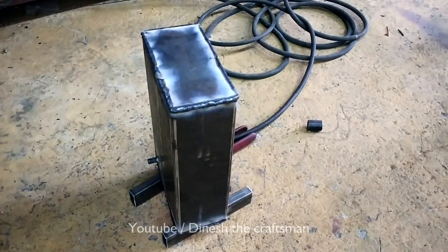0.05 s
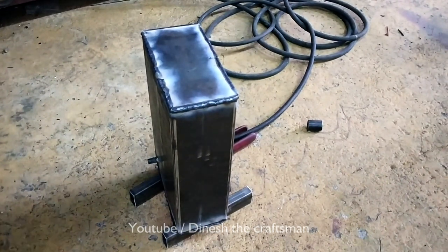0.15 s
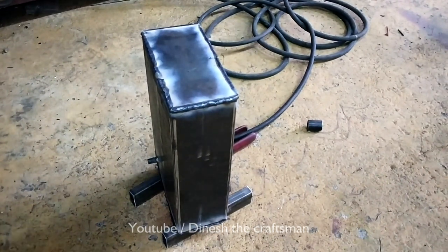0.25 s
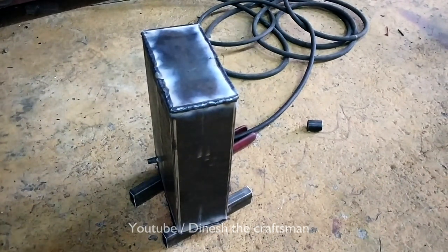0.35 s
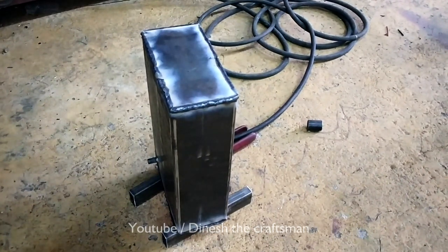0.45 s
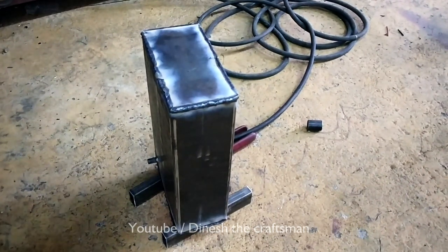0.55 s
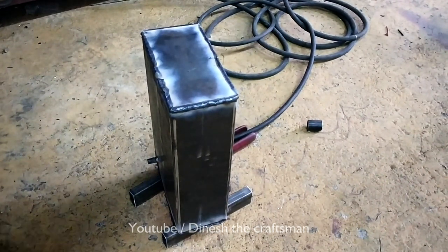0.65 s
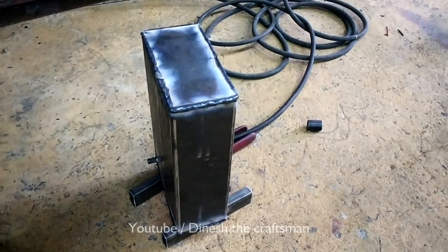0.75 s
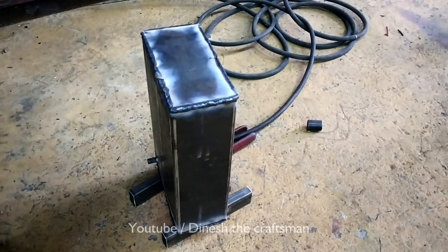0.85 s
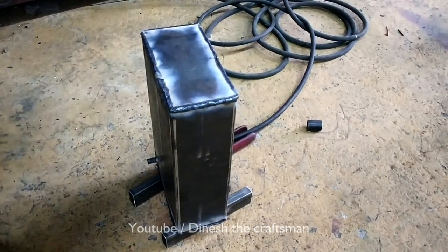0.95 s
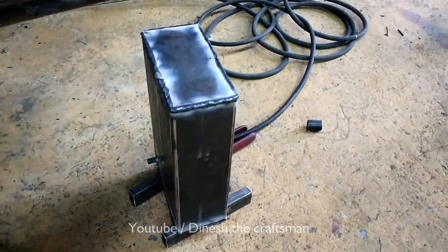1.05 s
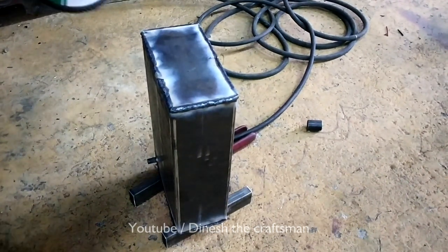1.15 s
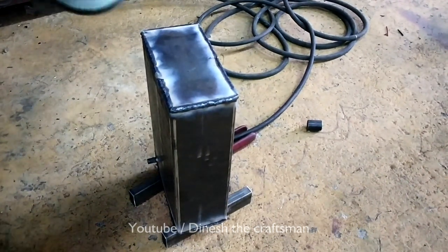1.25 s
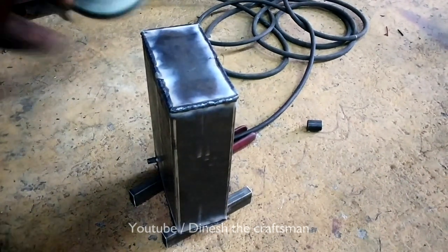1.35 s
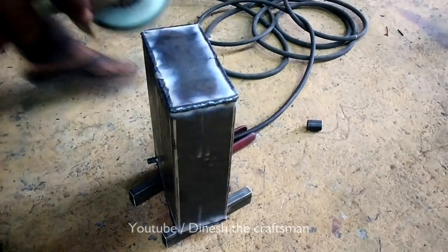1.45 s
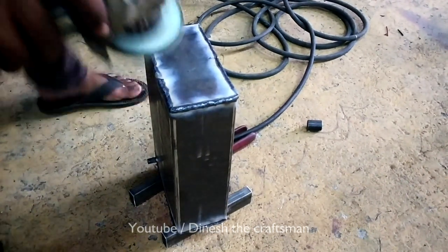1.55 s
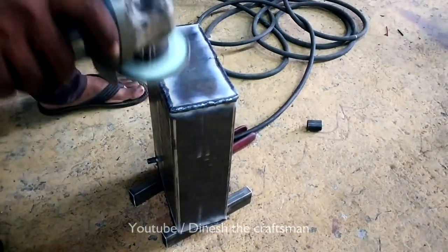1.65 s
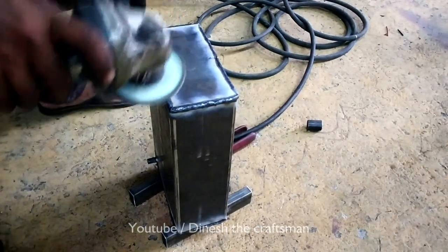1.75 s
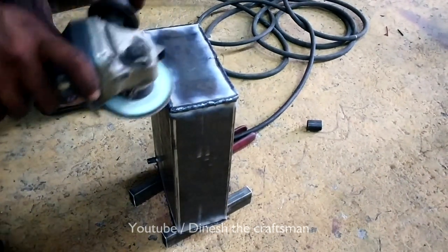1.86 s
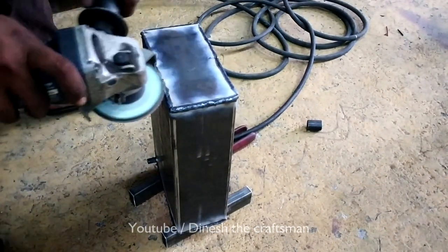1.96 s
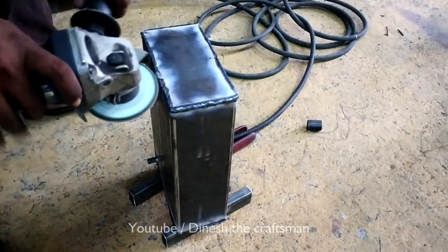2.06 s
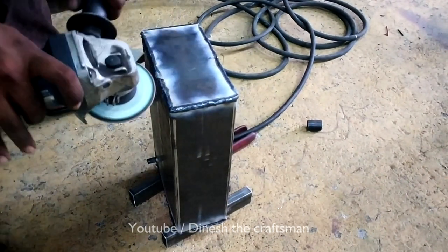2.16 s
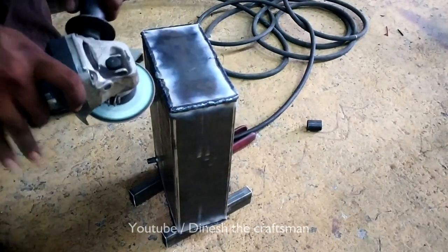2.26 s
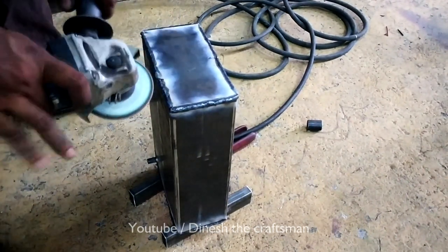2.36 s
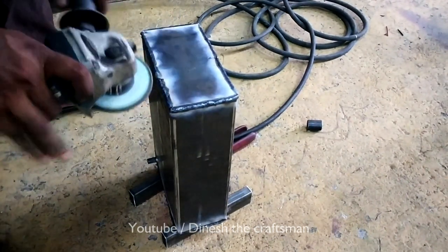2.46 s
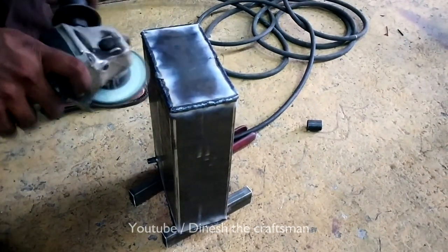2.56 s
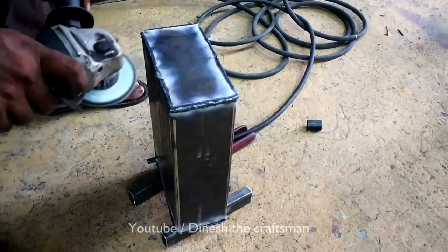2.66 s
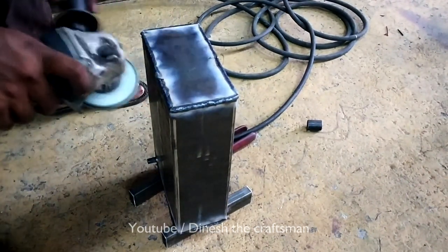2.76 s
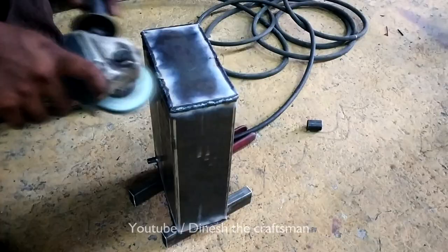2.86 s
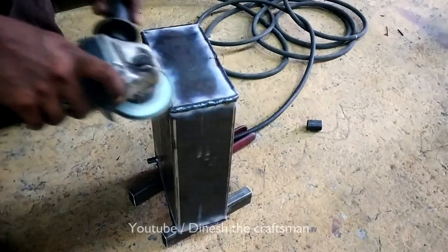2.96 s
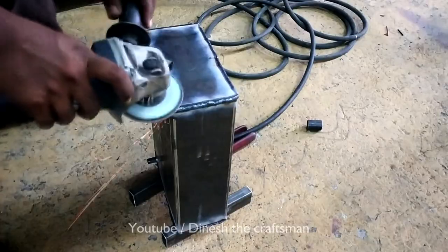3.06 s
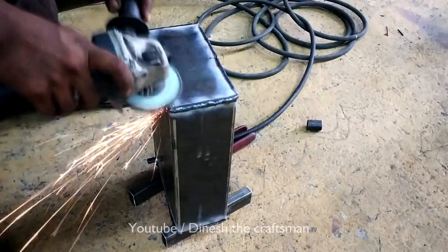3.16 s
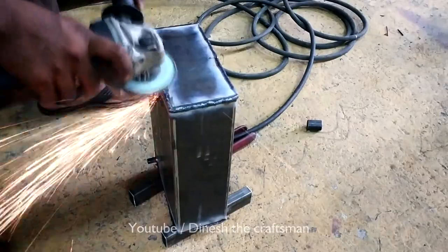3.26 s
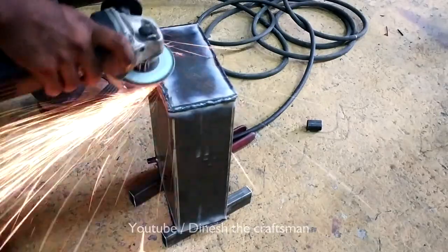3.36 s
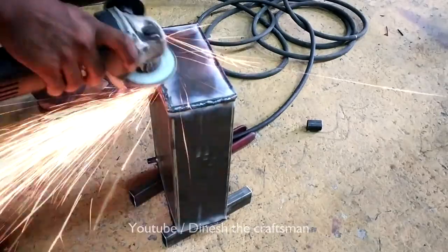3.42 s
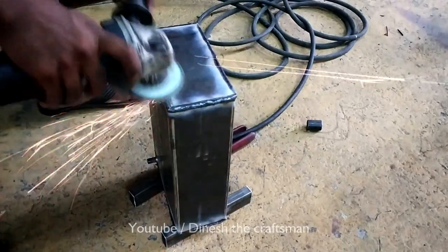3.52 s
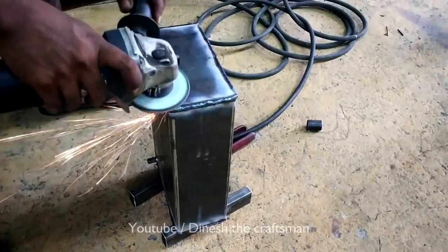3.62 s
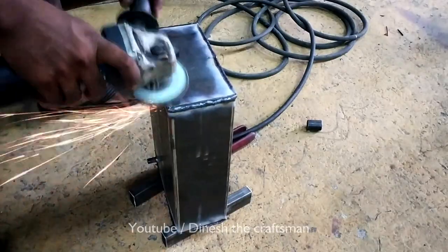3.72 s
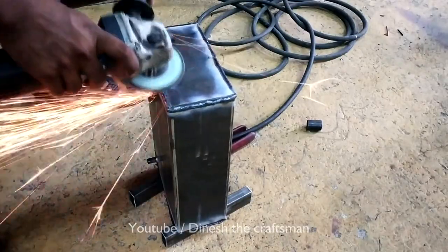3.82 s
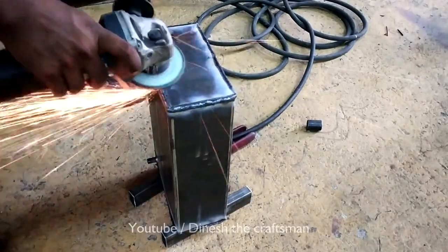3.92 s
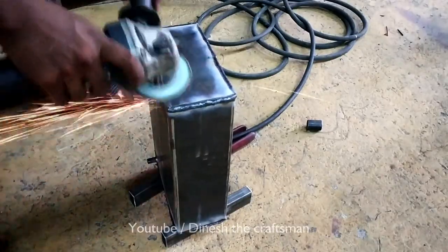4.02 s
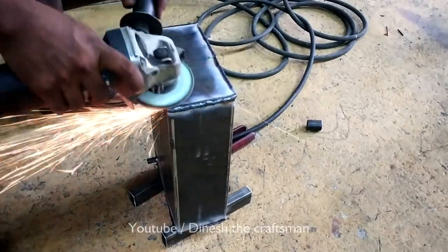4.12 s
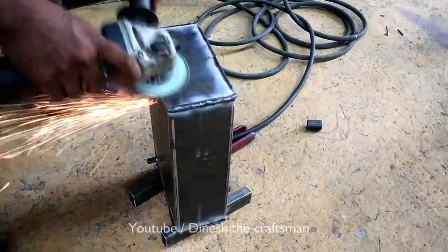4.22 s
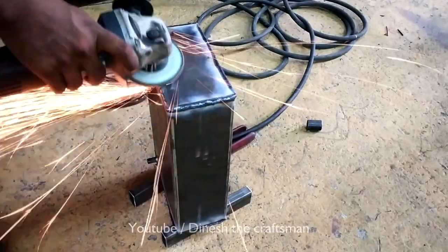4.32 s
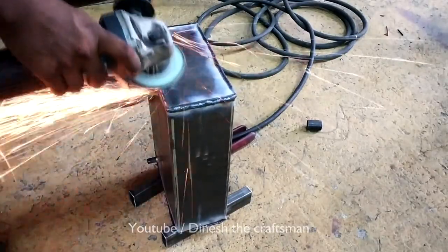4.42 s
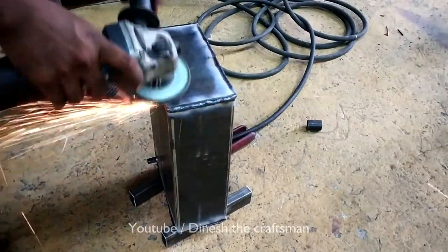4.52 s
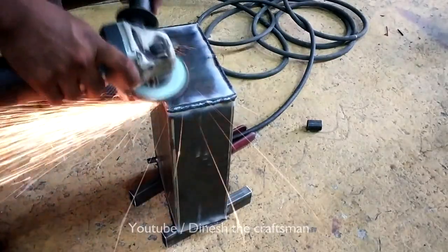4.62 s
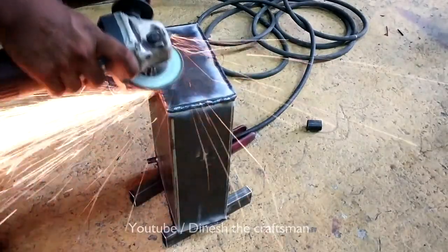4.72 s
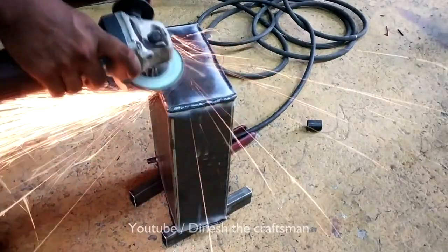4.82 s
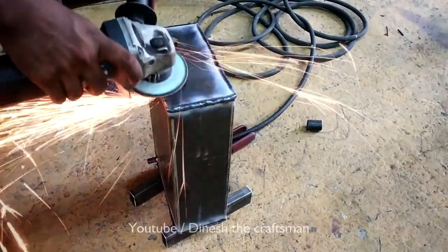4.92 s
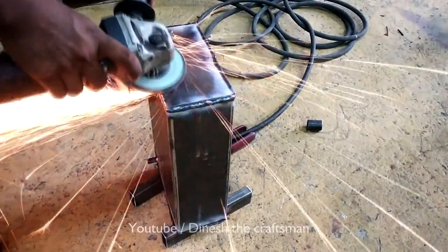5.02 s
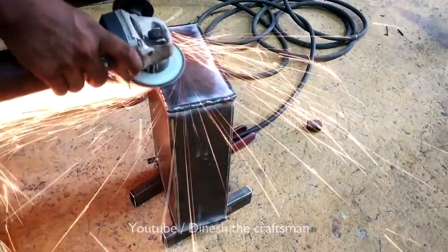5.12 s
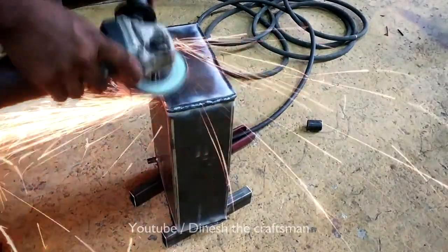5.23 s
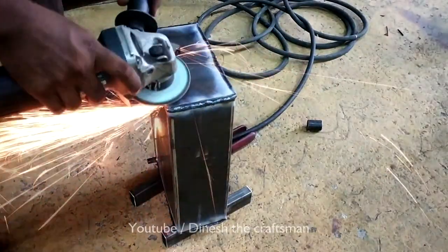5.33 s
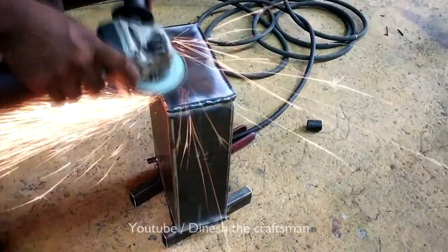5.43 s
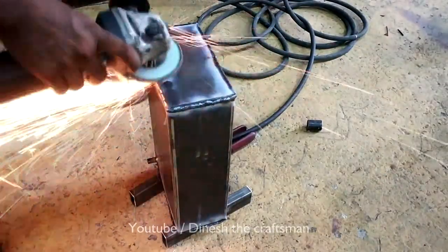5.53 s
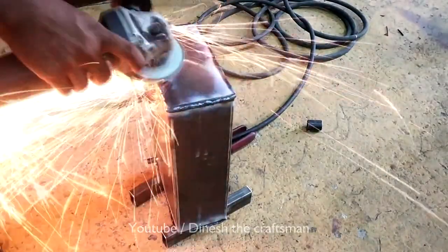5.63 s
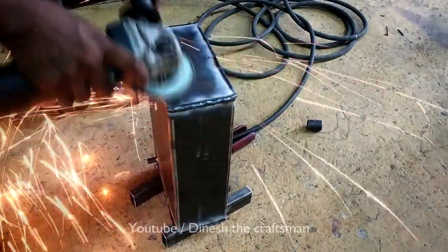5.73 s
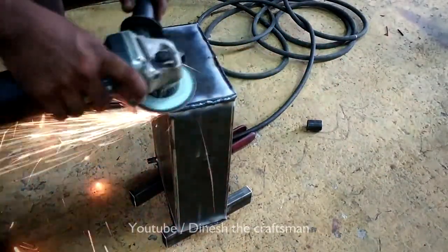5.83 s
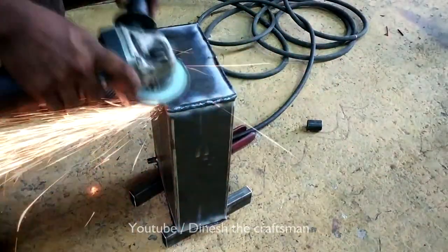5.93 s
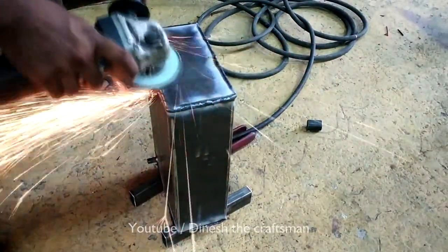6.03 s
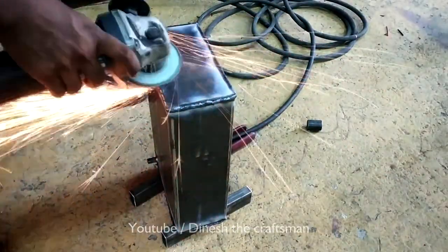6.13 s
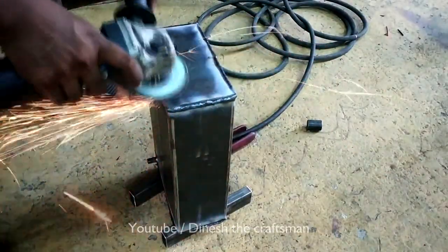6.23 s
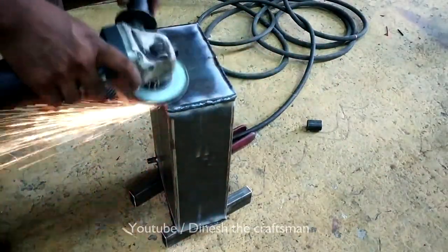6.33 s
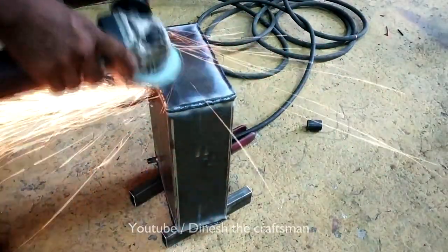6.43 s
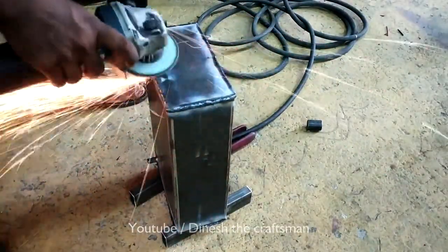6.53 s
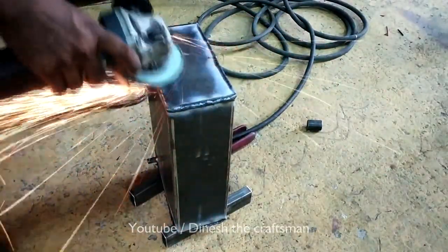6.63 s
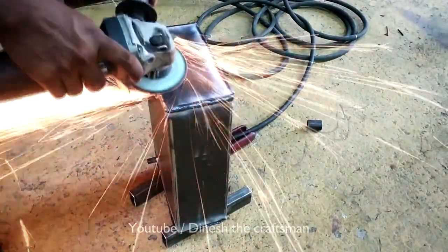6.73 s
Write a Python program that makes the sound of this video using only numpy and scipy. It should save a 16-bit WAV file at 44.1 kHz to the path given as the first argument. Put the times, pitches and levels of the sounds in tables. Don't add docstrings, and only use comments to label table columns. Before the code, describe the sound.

A distant workshop rush with a wavering low hum opens quietly; at 0.05 s a sandal briefly scrapes the gritty floor. A plastic knock sounds at 0.3 s, then a flurry of small clicks from 0.85 s and a faint rising creak near 1.05 s. A loud switch snap at 1.15 s starts the angle grinder: its whine sweeps up fast, slowing towards a high steady pitch by 2.6 s, with rattling gears, motor roar, airy fan hiss and briefly singing housing panels. At 3.05 s the disc bites steel and a piercing, grainy screech dominates while the motor drops behind it. It skips around 3.5 s, then grinds continuously, pitch sagging until about 5.5 s and recovering slightly, with hollow booms near 3.6, 4.8, 5.1, 5.8, 6.3 and 6.7 s. It is still grinding at the end. The pickup is close, bass-light, with short room reflections.

```python
import sys
import numpy as np
from scipy import signal
from scipy.fft import rfft, irfft, next_fast_len
from scipy.io import wavfile
from scipy.ndimage import uniform_filter1d

SR = 44100
rng = np.random.default_rng(int(sys.argv[2]) if len(sys.argv) > 2 else 0)


def field_ratio(decibels):
    return 10 ** (np.asarray(decibels, dtype=float) / 20)


def master_out(mix):
    frames = np.transpose(np.atleast_2d(mix))
    ceiling = np.clip(frames, -1, 1)
    pcm = np.round(ceiling * 32767).astype(np.int16)
    wavfile.write(sys.argv[1], SR, pcm)


N = 298998
T = np.arange(N) / SR
SWITCH_S, CONTACT_S = 1.175, 3.033
DISC_TURN, MAINS_HZ = 9 / 32, 50


def level(x, db):
    return x * field_ratio(db) / np.sqrt(np.mean(x ** 2))


def curve(table, before):
    s, value = np.transpose(table)
    return np.where(T < s[0], before, np.interp(T, s, value))


def bumps(table, edge_s):
    total = 0
    for s, span, db in table:
        rise = np.tanh((T - s + span / 2) / edge_s)
        fall = np.tanh((T - s - span / 2) / edge_s)
        total = total + db / 2 * (rise - fall)
    return total


def resonances(hz, modes):
    return sum(field_ratio(db) / np.sqrt(1 + (2 * (hz - f) / w) ** 4) for f, w, db in modes)


def shape(x, gain):
    return irfft(rfft(x) * gain(np.fft.rfftfreq(N, 1 / SR)), N)


def noise(table):
    hz, db = np.transpose(table)

    def gain(f):
        return field_ratio(np.interp(np.log(f + 1), np.log(hz), db, -90, -90))

    return level(shape(rng.standard_normal(N), gain), 0)


def walk(rate):
    k = int(SR / rate)
    held = np.repeat(rng.standard_normal(N // k + 1), k)
    return uniform_filter1d(uniform_filter1d(held, k), k)[:N]


def place(x, lag, pan_db):
    return np.array([np.roll(x, round(lag)) * field_ratio(pan_db / 2), x * field_ratio(-pan_db / 2)])


def room(x, t60, dry_db, wet_db, even, count):
    t = np.arange(int(SR / 4)) / SR
    tail = rng.standard_normal((count, 2, len(t))) * 1000. ** (-t / t60) * (t > .004)
    tail[:, 1] -= signal.lfilter(*signal.butter(1, 600, fs=SR), tail[:, 1] - tail[:, 0])
    share = np.ones((1, 1, 1))
    if count > 1:
        share = np.array([walk(11) for _ in range(count)])[:, None]
    share = share / np.sqrt(np.sum(share ** 2, axis=0))
    size = next_fast_len(N + len(t))
    echo = rfft(tail / np.sqrt(np.sum(tail ** 2) / 2 / count), size)
    echo = echo / np.abs(echo) ** even
    wet = irfft(np.sum(rfft(x * share, size) * echo, axis=0), size)[:, :N]
    return field_ratio(dry_db) * x + field_ratio(wet_db) * wet


# (frequency [Hz], density [dB per Hz])
SHOP_RUSH = [(18, -85), (30, -12), (165, -21), (215, -3), (374, -17.5), (473, -13.5), (512, -16.5),
             (684, -17), (760, -18), (844, -17.5), (962, -20), (1390, -21), (6210, -28.5), (14400, -38.5),
             (16000, -37)]


def shop():
    mid = noise(SHOP_RUSH) * field_ratio(1.0 * walk(12.0))
    side = shape(noise(SHOP_RUSH), lambda f: np.clip(f / 700, .3, 1))
    hum = shape(rng.standard_normal(N), lambda f: resonances(f, [(221.0, 10.0, 0)]))
    return level(mid + level(hum, -12.0) + side * np.array([[1], [-1]]), -38)


# (time [s], level [dB])
SCUFF = [
    (0.03, -72),
    (0.042, -79),
    (0.048, -31),
    (0.084, -36),
    (0.16, -62),
]


def scuff():
    grit = noise([(300, 6), (700, 2.0), (2000, -3), (4500, -9.0), (9000, -26)])
    return grit * field_ratio(5.2 * walk(300)) * (T < SCUFF[-1][0]) * field_ratio(curve(SCUFF, -90) - 1.5)


# (start [s], end [s], start pitch [Hz], end pitch [Hz], level [dB])
CREAK = (1.03, 1.1, 2240, 2600, -35)


def creak():
    t0, t1, hz0, hz1, db = CREAK
    swell = np.sin(np.pi * np.clip((T - t0) / (t1 - t0), 0, 1))
    turns = np.cumsum(np.interp(T, [t0, t1], [hz0, hz1])) / SR
    return field_ratio(db) * swell * np.sin(2 * np.pi * turns)


# (time [s], peak level [dB], main ring [Hz], left minus right [dB])
CLICKS = [(0.0495, -31, 800, -2), (0.285, -16, 2780, -7), (0.8545, -32, 4240, -2), (0.868, -30, 4310, -2),
          (0.882, -30, 4170, -1.5), (0.917, -27.5, 4330, -4), (0.945, -25.5, 4360, -1.5),
          (0.974, -29, 4800, -1), (1.0228, -25, 3900, -2), (1.1005, -19.5, 4350, -3),
          (1.104, -24, 2600, -2), (1.145, -30, 5030, -1), (1.1518, -24, 5000, -1),
          (1.1545, -8.5, 4200, -0.5), (1.1585, -24, 4300, -1), (1.1685, -23, 4230, -1)]
# (multiple of the main ring [ratio], level [dB])
SHELL_RINGS = [(1.0, 3), (0.72, -3), (1.62, 0), (2.3, -23), (3.3, -22)]


def clicks():
    out = np.zeros((2, N))
    t = np.arange(2000) / SR
    crack_band = signal.butter(2, [2500, 12000], "band", fs=SR)
    fade = 1000. ** (-t / 0.0085) * np.minimum(t / 0.00025, 1)
    for s, db, hz, pan_db in CLICKS:
        crack = signal.lfilter(*crack_band, rng.standard_normal(len(t)))
        shell = sum(field_ratio(ring_db) * np.sin(2 * np.pi * ratio * hz * t) for ratio, ring_db in SHELL_RINGS)
        click = fade * (shell + 0.79 * crack / np.std(crack[:100]))
        pan = np.array([[pan_db], [-pan_db]]) / 2
        i = int(s * SR)
        out[:, i:i + len(t)] += field_ratio(db - 5 + pan) * click
    return out


# (frequency [Hz], width [Hz], level [dB])
GEAR_CASE = [(15100, 1200, 4), (14200, 1100, -3), (13000, 1000, -8)]


def ticks(load):
    gap, force = rng.standard_normal((600, 2)).T
    at = np.cumsum(SR / 60 * np.exp(.2 * gap)).astype(int)
    knocks = np.zeros(N)
    knocks[at[at < N]] = field_ratio(3 * force)[at < N]
    burst = signal.lfilter([1], [1, -np.exp(-1 / (.0015 * SR))], knocks)
    gate = level(burst, 0) * (1 - 0.54 * load) + 0.36
    return level(shape(gate * rng.standard_normal(N), lambda f: resonances(f, GEAR_CASE)), 0)


# (centre [s], length [s], pitch [Hz], level re roar [dB])
PANELS = [(1.23, 0.021, 790, -2), (1.255, 0.033, 698, -8), (1.335, 0.064, 660, -10), (1.46, 0.069, 710, -8),
          (1.703, 0.27, 2360, -9), (2.55, 0.26, 920, -8), (2.2, .07, 1394, -8), (2.75, 0.045, 1000, -19),
          (3.04, .05, 1460, -16), (1.308, .025, 4700, -4), (1.245, .03, 2050, -8)]


def panels():
    out = 0
    for s, span, hz, db in PANELS:
        swell = bumps([(s, span, 1)], 0.011)
        out = out + field_ratio(db) * swell * np.sin(2 * np.pi * hz * T + 1.0 * walk(29.7))
    return out


# (multiple of armature turn [ratio], free level re roar [dB], loaded level re roar [dB])
WHINE = [(9 / 32, -45, -52), (0.9916, -31, -28), (1.549, -34, -32), (1.994, -34, -28), (2.8125, -30, -24),
         (3.094, -36, -30), (4.0, -25.5, -36), (6.98, -42, -34), (9.1, -46, -30), (11.86, -17, -29),
         (23.72, -21, -30)]
# (frequency [Hz], width [Hz], gain [dB])
HOUSING = [(518, 35, 9), (531.4, 12, 11), (800, 40, 11), (1027, 64, 13), (1090, 36, 12), (1565, 46, 5.5),
           (2300, 690, 11), (3670, 470, 24), (4400, 400, 13), (5350, 460, 10)]
# (frequency [Hz], width [Hz], gain [dB])
HANDLE = [(382, 82, 26.5)]


def whine(hz, turns, load):
    throb = 1 + 0.97 * np.cos(4 * np.pi * MAINS_HZ * T + 0.31)
    out = 0
    for k, free_db, load_db in WHINE:
        db = free_db + load * (load_db - free_db) + 2.4 * walk(5.6)
        wobble = .07 * k * walk(40)
        modes = HOUSING + HANDLE if k < 1 else HOUSING
        tone = np.sin(2 * np.pi * k * turns + wobble)
        out = out + field_ratio(db) * (1 + resonances(k * hz, modes)) * tone * throb ** min(k / 8, 1.5)
    return out


# (centre [s], length [s], roar rise [dB])
LIFTS = [(3.45, 0.085, 5.5), (3.61, 0.17, 6), (3.75, 0.088, 3), (4.08, 0.24, 2), (4.52, 0.13, 3),
         (4.78, 0.048, 4.5), (4.97, 0.11, 3.5), (5.12, 0.08, 4.5), (5.57, 0.05, 2.5), (5.71, 0.11, 5.5),
         (5.83, 0.12, 5.5), (6.3, 0.14, 5), (6.5, 0.089, 0.5), (6.74, 0.14, 4)]


def roar_level():
    free_db, loaded_db = -26, -35.5
    rise = -9.5 * np.exp(-np.maximum(T - SWITCH_S, 0) / 0.015)
    duck = (loaded_db - free_db) * np.clip((T - CONTACT_S) / 0.069, 0, 1)
    return np.where(T < SWITCH_S, -90, free_db + rise + duck), bumps(LIFTS, 0.014)


# (frequency [Hz], density [dB per Hz])
ROAR = [(71, -56), (120, -32), (239, -20), (455, -13.5), (570, -10.5), (692, -12), (920, -7), (1040, -8),
        (2050, -5.5), (2330, -2), (2600, -4.5), (2830, -4.5), (4300, -9.5), (5590, -65), (9460, -120)]
# (frequency [Hz], density [dB per Hz])
FAN = [(2530, -14), (4300, 0), (5860, 1), (7200, -0.5), (7900, -2.5), (10400, -2.5), (12100, -7.5),
       (13000, -2.5), (15800, -14)]


def motor(turns, load, steady_db, boom_db):
    flutter = 1 + 0.15 * np.cos(2 * np.pi * DISC_TURN * turns)
    roar = noise(ROAR) * field_ratio(1.26 * walk(24.94) + boom_db)
    fan_db = np.interp(load, [0, 1], (-1, 1.5)) + 0.69 * boom_db
    fan = noise(FAN) * flutter * field_ratio(fan_db + 4.5 + 2.0 * walk(29.97))
    return field_ratio(steady_db) * (roar + fan)


# (time [s], turns per second [Hz])
SPEED = [(1.175, 124.0), (1.24, 272.0), (1.29, 329.5), (1.34, 374.1), (1.4, 410.7), (1.54, 477.8),
         (1.74, 525.0), (2.16, 573.1), (2.6, 595.1), (3.05, 600.0), (3.4, 578.3), (3.9, 560.2),
         (4.6, 537.1), (5.0, 514.9), (5.5, 501.9), (5.9, 511.4), (6.36, 520.0), (6.78, 505.9)]


def armature_speed():
    return curve(SPEED, -0.5)


# (time [s], level [dB])
GRIND = [
    (3.04, -38),
    (3.06, -24),
    (3.35, -21.5),
    (3.9, -23),
    (4.8, -23),
    (5.16, -24),
    (5.34, -26),
    (5.75, -24),
    (6.6, -23.5),
    (6.78, -24.5),
]
# (centre [s], length [s], change [dB])
SKIPS = [
    (3.43, .03, -8),
    (3.47, .025, 4),
    (3.495, 0.022, -15),
    (3.555, .03, -7),
    (3.76, .04, 1.5),
    (4.18, .05, 2),
    (4.8, 0.046, 1.5),
    (5.92, 0.031, -5),
    (6.15, .04, 1.5),
    (6.19, .04, -3),
]


def bite():
    return field_ratio(curve(GRIND, -90) + bumps(SKIPS, 0.011) - 0.25 + 0.38 * walk(40))


# (marks per turn [count], width [marks], level [dB])
FACE = [(72.2, 3, -8), (76, 11, -7), (65, 9.7, -12), (88, 20, -8), (50, 37, -22)]
# (marks per turn [count], level [dB])
FLAPS = [(71, -13), (72, -8), (73, -11)]


def disc(turns, size=1024):
    angle = DISC_TURN * turns
    count = int(angle[-1]) + 2
    face = signal.lfilter([1], [1, -.35], rng.standard_normal((count, size)), axis=0)
    grain = resonances(np.arange(size // 2 + 1), FACE)
    face = irfft(rfft(face, axis=1) * grain, size, axis=1).ravel()
    now = np.interp(angle * size, np.arange(face.size), face)
    later = np.interp(angle * size, np.arange(face.size), np.roll(face, -size))
    part = angle % 1
    runout = 1 + 0.056 * np.cos(2 * np.pi * angle)
    screech = level((now * (1 - part) + later * part) * runout, 0)
    seam = 0
    for marks, db in FLAPS:
        line = np.sin(2 * np.pi * marks * angle + 1.6 * walk(25))
        seam = seam + field_ratio(db + 3 * walk(16)) * line
    return (screech + seam) * bite()


def scene():
    hz = armature_speed()
    turns = np.cumsum(hz) / SR
    load = np.clip((T - CONTACT_S) / 0.021, 0, 1)
    steady_db, boom_db = roar_level()

    duck_db = np.where(T < SWITCH_S, 0, np.minimum(steady_db + boom_db + 14.5, 0))
    background = shop() * field_ratio(duck_db)

    handling = clicks() + place(scuff() + creak(), 10.7, -1.9)
    gear_db = np.interp(load, [0, 1], (-33.5, -33)) + 6.5
    gears = ticks(load) * field_ratio(gear_db) * np.clip((T - SWITCH_S) / 0.2, 0, 1)
    tones = (whine(hz, turns, load) + panels()) * field_ratio(steady_db + 0.98 * load)
    sharp = handling + place(gears, 5, 0.96) + place(tones, 3, -0.62)
    close = room(sharp, 0.15, 0, -9, 0, count=1)

    tool = motor(turns, load, steady_db, boom_db)
    near = place(tool * (1 - load), 7.48, -0.31) + place(tool * load, 4.7, -1.4)
    near = near + place(disc(turns), 3.82, 2.6)
    grinder = room(near, 0.15, -3.5, -1.02, 0.93, count=3) * (T > SWITCH_S)
    return background + close + grinder


def band_limit(x):
    return signal.sosfilt(signal.butter(12, 17060, fs=SR, output="sos"), x)


def record(dry):
    bass_cut = signal.butter(3, 190, "high", fs=SR, output="sos")
    top_cut = signal.ellip(12, .5, 80, 15850, fs=SR, output="sos")
    mix = signal.sosfilt(np.vstack([bass_cut, top_cut]), dry)
    return band_limit(mix)


dry = scene()
out = record(dry)
master_out(out)
```